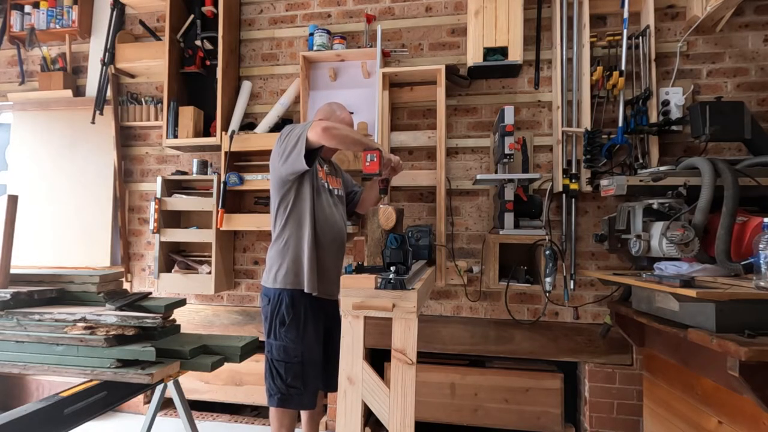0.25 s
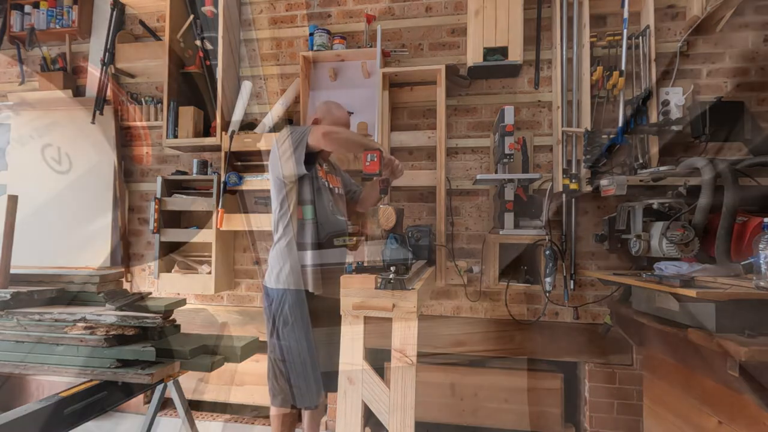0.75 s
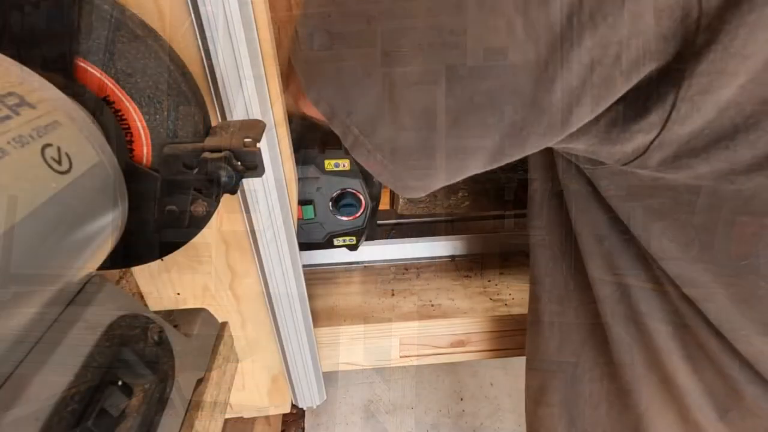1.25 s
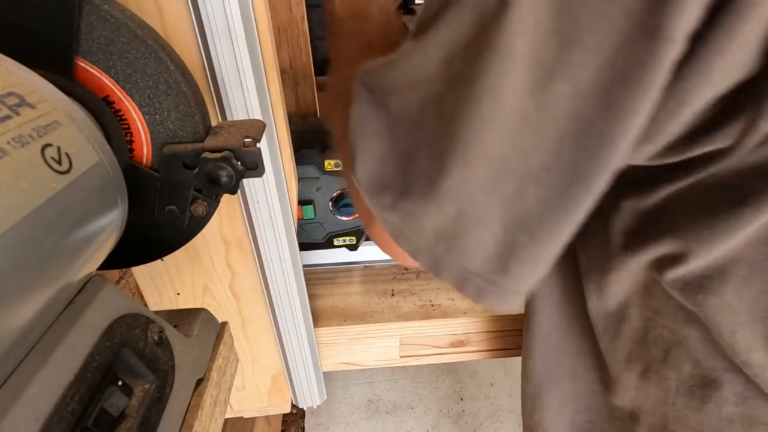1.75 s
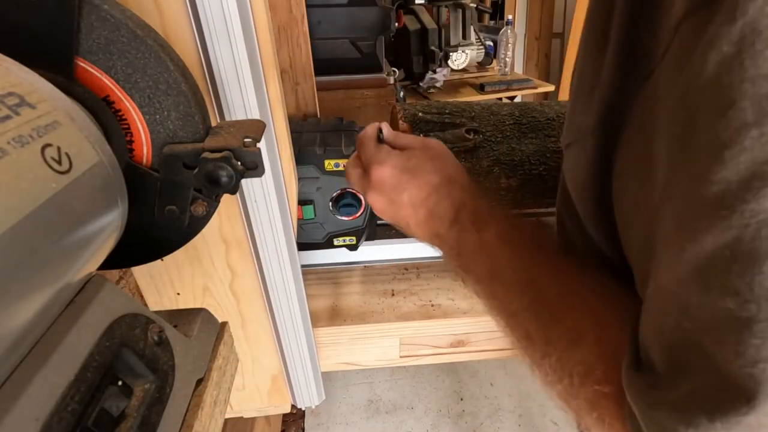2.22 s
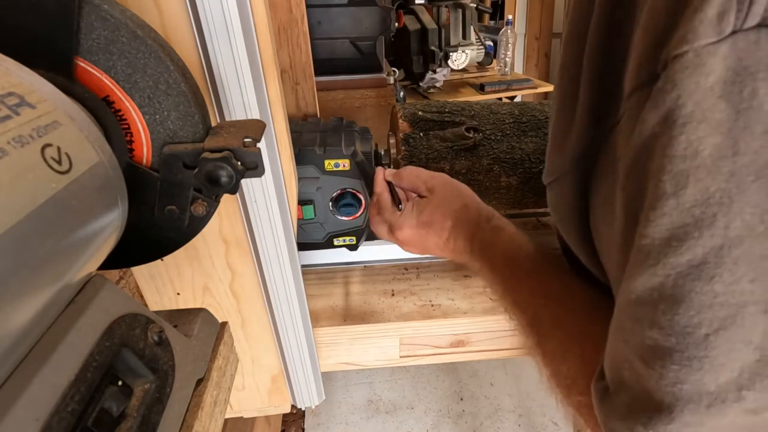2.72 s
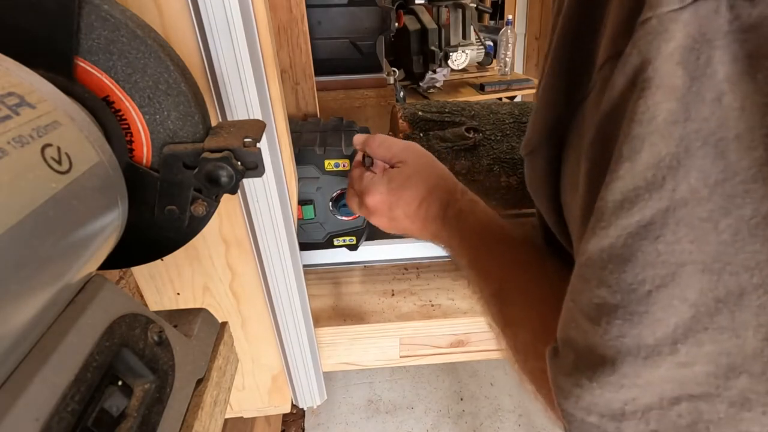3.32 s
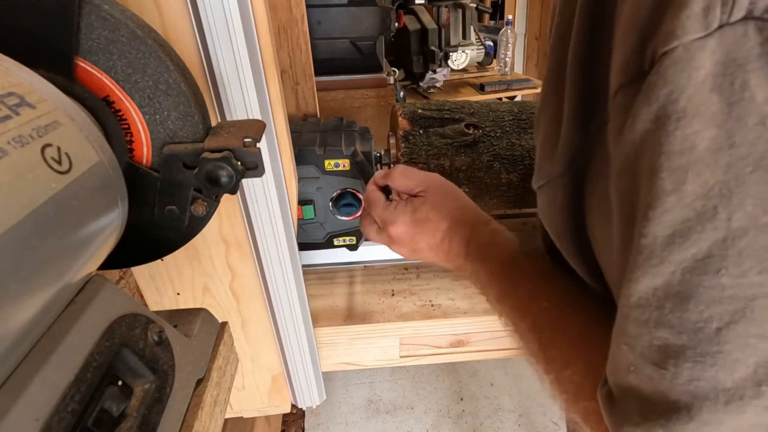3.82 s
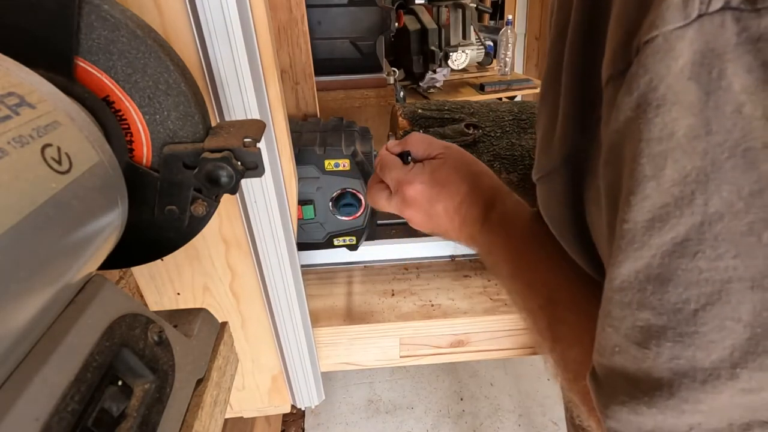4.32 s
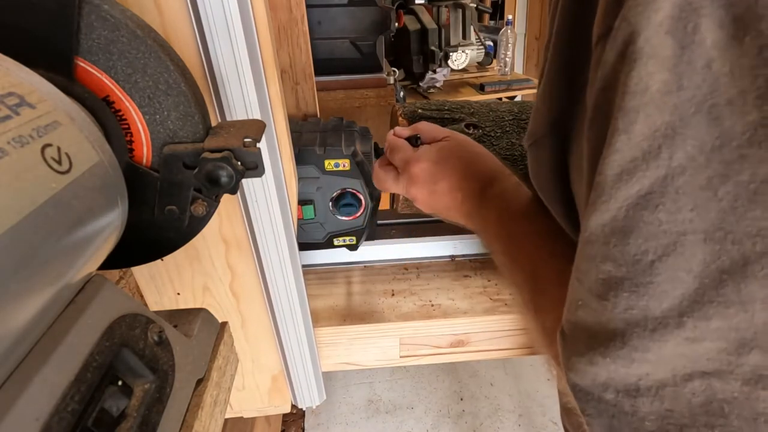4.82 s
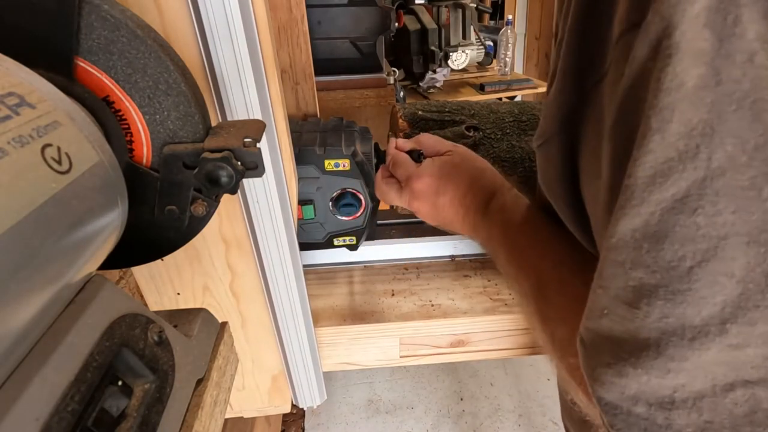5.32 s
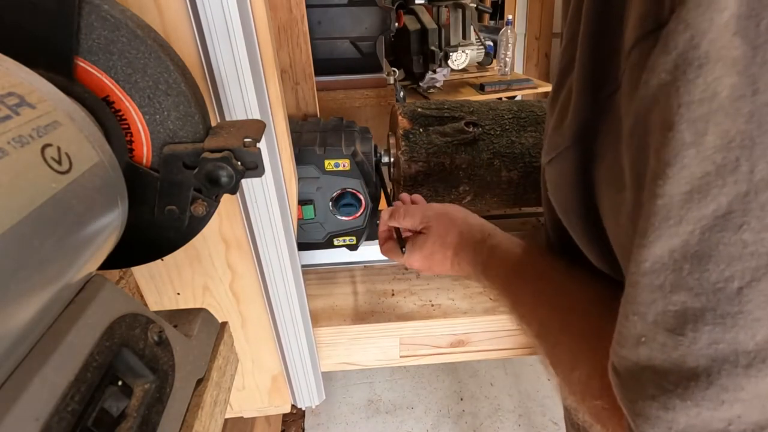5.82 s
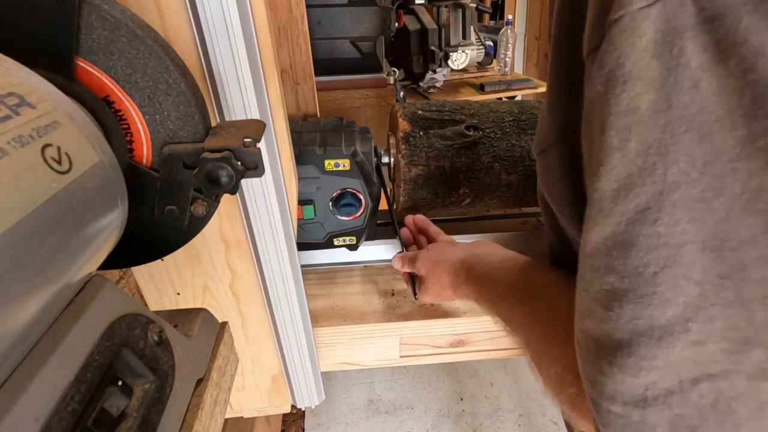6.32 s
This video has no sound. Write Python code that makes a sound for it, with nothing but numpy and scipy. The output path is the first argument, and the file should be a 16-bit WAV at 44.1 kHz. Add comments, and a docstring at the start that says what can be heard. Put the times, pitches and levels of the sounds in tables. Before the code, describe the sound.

A log is being clamped to a wooden sled in a quiet workshop. Irregular hollow knocks mix with brief timber scrapes and small creaks. Midway a clamp snaps tight and rings briefly, followed by the loudest knocks and bright wrench clinks. Lighter taps thin out, and a hand and shirt rub softly along the bench. The sounds are close, with slight room echo and very faint chirps.

```python
"""Brick workshop, saw not running: a log is clamped on a wooden sawmill sled with a steel wrench.
Blows ring the sled's modes; timber scrapes over timber in tiny slips; loaded joints creak.
Wrench and chain clink, and the clamp snaps tight once, its bar ringing on.
Near the end a hand and shirt rub along the bench. Faint chirps and room tone lie underneath."""
import sys
import numpy as np
from scipy import signal
from scipy.fft import rfft, irfft, next_fast_len
from scipy.io import wavfile
from scipy.ndimage import uniform_filter1d, map_coordinates

SR = 44100
rng = np.random.default_rng(int(sys.argv[2]) if len(sys.argv) > 2 else 0)


def digitize_waveform(pressure):
    """Quantize a signal to 16-bit integers and store it at the path in sys.argv[1].

    Rows of a 2-D input are taken as channels; values are limited to [-1, 1].
    """
    field = np.atleast_2d(pressure).T
    bounded = np.clip(field, -1, 1)
    quanta = np.round(bounded * 32767).astype(np.int16)
    wavfile.write(sys.argv[1], SR, quanta)


N = 289296
TIME_S = np.arange(N) / SR
HIT_S = np.arange(SR // 2) / SR  # time axis of one impact
TOP_HZ = 13900


# sled modes: f/Hz, level/dB, t60/s
SLED_MODES = [(290, -7.5, 0.097), (382.4, 2, 0.084), (390, -4, 0.13), (526.5, -5.5, 0.085),
              (804, -2.5, 0.077), (908, -3.5, 0.025), (1034, -5.5, 0.049), (1215, -6, 0.03),
              (1434, 0, 0.023), (1895, -2, 0.012), (2360, -2.5, 0.011), (2686, -13, 0.015),
              (3320, -3, 0.0055), (3960, -12.5, 0.025), (4780, -15, 0.0058)]
# blows, before band trims: t/s, level/dB, thump/dB re level, tick/dB re level, favoured mode f/Hz
SLED_BLOWS = [(0.586, -25.5, -17, -5.5, 2544), (0.81, -18, -1, -23.5, 870), (0.825, -16.5, 0.5, -9.5, 924),
              (0.961, -9, -4.5, -15.5, 880), (1.0, -14, -13, -10, 2605), (1.136, -18.5, -1, -31.5, 946),
              (1.201, -15.5, -5.5, -17, 797), (1.291, -28.5, 0, -10, 2470), (1.611, -16.5, -4, -20, 834),
              (1.778, -42.5, 5, -16, 770), (2.364, -10.5, -4.5, -14, 2082), (2.39, -19.5, -20, -30, 950),
              (2.416, -24, -2.5, -21, 1356), (2.427, -19.5, -1, -17.5, 786),
              (2.586, -23.5, -8, -12.5, 1018), (2.834, -11.5, -6, -5.5, 1400),
              (3.054, -27.5, -24, -30, 1010), (3.114, -10, -14, -5, 1094), (3.121, -12, -20, -20, 1036),
              (3.418, -26, 0, -25, 790), (3.455, -27.5, -5.5, -5.5, 1680), (3.539, -6, -6, -13.5, 1437),
              (3.645, -7.5, -17.5, -4.5, 1620), (3.787, -19, -14.5, -1, 1086), (3.798, -21, -9.5, -2, 820),
              (3.963, -26, -15, -49, 840), (4.096, -36, -3, -4.5, 1500), (4.24, -21.5, -1, -4.5, 1060),
              (4.503, -16.5, -3, -17, 812), (4.625, -16.5, -11, -13, 1492), (4.705, -22.5, -7, -17.5, 826),
              (5.206, -31.5, -5, -11.5, 1900), (5.66, -31, -5, -25, 745)]

def knocks():
    """The sled rings briefly; the strike point favours one mode, and hard contacts carry more treble."""
    out = np.zeros(N)
    for at_s, level_db, thump_db, tick_db, mode_hz in SLED_BLOWS:
        modes = ring(SLED_MODES, scatter_db=2.5, detune=0.028)
        blow = bending_waves(modes, lag_s=0.001908) + amp(1) * burst(t60_s=0.01)
        mode_envelope = amp(-60 * HIT_S / 0.025) * (1 - np.exp(-HIT_S / 0.0021))
        favoured = np.sin(2 * np.pi * mode_hz * HIT_S) * mode_envelope
        reflected = bench_echoes(blow, echo_db=-10.5, spread_s=0.0055)
        smeared = soft_contact(reflected, corner_hz=7000 * 2 ** (tick_db / 9))
        thump = sized(band(blow, 234, 628), level_db + thump_db - 3)
        rap = sized(sized(band(smeared, 805, 1910), 0) + sized(favoured, -1.5), level_db - 8)
        tick = sized(band(smeared, 2320, 5560), level_db + tick_db - 9.5)
        fizz = sized(band(smeared, 6000, 12000), level_db + tick_db - 33)
        rattle = sized(band(burst(t60_s=0.48), 270, 2630), level_db - 24.5)  # loose boards
        add(out, at_s - 0.0005, workshop(thump + rap + tick + fizz, wet_db=-12) + rattle)
    return out


# wrench and chain modes: f/Hz, level/dB, t60/s
STEEL_MODES = [(1476, -6, 0.17), (2390, -6, 0.13), (2640, 7, 0.021), (3010, -5, 0.041), (3400, -11.5, 0.12),
               (3900, -12, 0.044), (4350, -22.5, 0.59), (4870, -3.5, 0.054), (5580, 2, 0.023),
               (6260, 1.5, 0.035), (6550, -12, 0.25), (7380, 2.5, 0.059), (8360, -3, 0.11),
               (9600, -20, 0.12), (9900, -6, 0.09), (10220, -3.5, 0.1), (12500, -47, .06)]
# steel on steel, before band trims: t/s, level/dB, sparkle/dB re level
STEEL_CONTACTS = [(2.4178, -29.5, -23.5), (3.418, -38.5, -21), (3.499, -7.5, -19.5), (3.5129, -13.5, -17),
                  (3.7701, -14, -26.5), (3.7955, -18, -22), (4.4484, -31.5, -23)]

def clinks():
    """Wrench and chain links ring high and short, and jolt the wood under them."""
    out = np.zeros(N)
    for at_s, level_db, sparkle_db in STEEL_CONTACTS:
        steel = ring(STEEL_MODES, scatter_db=2, detune=0.0022) + amp(5) * burst(t60_s=0.079)
        clink = sized(band(steel, 1400, 5000), level_db - 11.5)
        sparkle = sized(band(steel, 7000, 14000), level_db + sparkle_db - 5.5)
        jolt = sized(band(burst(t60_s=0.16), 130, 1330), level_db - 17)
        add(out, at_s, workshop(clink + sparkle + jolt, wet_db=-19))
    return out


# clamp bar modes: f/Hz, relative level/dB, t60/s
CLAMP_MODES = [(830, 2, 0.18), (1080, -2, 0.19), (1610, -20, 0.36), (2100, -9, 0.31), (2500, -16, 1),
               (3000, -4.5, 0.33), (2860, -7, 0.19), (3160, -9, 0.15), (4592, -15, 0.47)]

def clamp_snap(at_s=3.115):
    """The clamp snaps tight with a hard crack; its bar buzzes and sings on."""
    crack = amp(1) * band(burst(t60_s=0.047), 2250, 3050)
    crack += amp(-3.5) * band(burst(t60_s=0.0093), 4070, 5800)
    bar = amp(-35.5) * ring(CLAMP_MODES, scatter_db=0.5, detune=0)
    buzz = amp(-14) * band(burst(t60_s=0.39), 2130, 2720)
    buzz += amp(-30.5) * band(burst(t60_s=0.41), 2600, 4800)
    out = np.zeros(N)
    add(out, at_s, workshop(crack + bar + buzz, wet_db=-29))
    return out


# timber friction spectrum: f/Hz, relative level/dB
RUB_SPECTRUM = [(88, -53), (150, -6.5), (385, 2), (641, -13), (788, -3), (1240, -6), (1470, -11),
                (2180, -16), (4060, -27.5), (8970, -58.5), (11900, -55), (13600, -78)]
# strokes: t/s, length/s, mid-stroke level/dB, swell/dB, grit/dB re level, squeal f/Hz, squeal/dB re level
TIMBER_STROKES = [(0.604, 0.043, -42, -2, -9, 983, -9), (1.033, 0.072, -37, 8, -10.5, 905, -3.5),
                  (1.29, 0.056, -38, -2.5, -9.5, 841, -9.5), (1.556, 0.085, -32.5, 2, -6, 846, -4.5),
                  (3.032, 0.085, -42.5, 13.5, -2.5, 1038, 0.5), (3.543, 0.119, -31, 8, -16, 360.3, -6.5),
                  (3.992, 0.062, -47.5, 4, -12, 554, 2), (4.227, 0.05, -30.5, -7, -8, 722, -8),
                  (4.404, .044, -31, 7, -6, 537, -9), (4.69, .185, -35.5, 5, -8.5, 791, -12),
                  (5.786, 0.053, -39.5, -7, -6, 498, -7.5)]

def scrapes(attack_s=0.017, release_s=0.014):
    """Tiny uneven slips shake the sled's modes and one resonance squeals; grit follows the pressure."""
    slips = rng.standard_normal(N) * amp(7 * np.tanh(wobble(210)))
    rub = filtered(slips, lambda hz: amp(along(RUB_SPECTRUM, hz)))
    modes = ring(SLED_MODES, scatter_db=-0.5, detune=0)
    wood = signal.fftconvolve(np.diff(slips, prepend=0), modes)[:N]
    body = unit(band(unit(rub) + amp(-3.5) * unit(wood), 210, 2290))
    grit, fizz = unit(band(rub, 1985, 6500)), unit(band(rub, 7000, 17000))
    out = np.zeros(N)
    for at_s, length_s, level_db, swell_db, grit_db, squeal_hz, squeal_db in TIMBER_STROKES:
        elapsed_s = np.clip(TIME_S - at_s, 0, length_s)
        ramp_db = swell_db * (elapsed_s / length_s - 0.5)
        fizz_db = -28 + 58 * elapsed_s  # brighter as the timber gathers speed
        grain = amp(grit_db + 2.1 * ramp_db) * (grit + amp(fizz_db) * fizz)
        rubbing = stroke(at_s, length_s, attack_s, release_s) * (amp(ramp_db) * body + grain)
        squeal = np.zeros(N)
        add(squeal, at_s, unit(glide(length_s + 2 * release_s, squeal_hz, squeal_hz, rough=0.05)))
        out += amp(level_db) * (rubbing + amp(squeal_db + ramp_db) * squeal)
    return workshop(out, wet_db=-17.5)


# joint creaks: centre t/s, length/s, f/Hz, level/dB
JOINT_CREAKS = [(1.632, 0.048, 3680, -35), (3.03, .12, 194, -36), (3.135, 0.0586, 195, -29),
                (3.428, 0.0453, 297, -26), (3.65, .2, 255, -32)]

def creaks():
    """Loaded joints stick and slip at one of their resonances."""
    out = np.zeros(N)
    for centre_s, length_s, hz, level_db in JOINT_CREAKS:
        add(out, centre_s - length_s / 2, amp(level_db) * glide(length_s, hz, hz, rough=0.05))
    return workshop(out, wet_db=-16)


# cloth friction spectrum: f/Hz, relative level/dB
CLOTH_SPECTRUM = [(88, -45), (150, -12.5), (350, 3), (465, -11.5), (521, 2), (629, -12), (1240, -15),
                  (1410, -12), (2400, -25), (2950, -23.5), (6630, -37), (8970, -46.5), (11900, -46.5),
                  (13600, -66)]

def hand_slide(level_db=-38):
    """Hand and shirt rub along the bench: one long stroke of soft, slightly uneven friction."""
    friction = rng.standard_normal(N) * amp(1.4 * wobble(90))
    cloth = unit(filtered(friction, lambda hz: amp(along(CLOTH_SPECTRUM, hz))))
    return amp(level_db) * cloth * stroke(at_s=5.93, length_s=0.54, attack_s=0.078, release_s=0.097)


# far-off calls: centre t/s, length/s, start f/Hz, end f/Hz, level/dB
FAR_CHIRPS = [(.03, .14, 1713, 1720, -51), (.046, 0.11, 5820, 6200, -58.5),
              (0.044, 0.14, 2925, 3200, -52.5), (0.071, 0.18, 4380, 4170, -54.5),
              (5.04, .2, 3300, 2600, -61), (6.424, 0.09, 3000, 3350, -54.5), (6.534, .09, 3380, 3840, -54)]

def chirps():
    """Thin wavering calls, perhaps birds outside, arriving mostly by way of the walls."""
    out = np.zeros(N)
    for centre_s, length_s, from_hz, to_hz, level_db in FAR_CHIRPS:
        add(out, centre_s - length_s / 2, amp(level_db) * glide(length_s, from_hz, to_hz, rough=0.032))
    return workshop(out, wet_db=1)


# room tone spectrum: f/Hz, relative level/dB
ROOM_SPECTRUM = [(15, -81), (25, -43), (72, -10.5), (139, -3), (247, -9), (466, -15), (531, -13.5),
                 (924, -18.5), (1340, -20.5), (2090, -24.5), (3640, -30.5), (11600, -58), (13600, -63)]

def room_tone(rise_s=1.2):
    """Rumble, a drifting body and a near-steady hiss; the lows come up at first."""
    noise = filtered(rng.standard_normal(N), lambda hz: amp(along(ROOM_SPECTRUM, hz)))

    def part(lo_hz, hi_hz):
        return unit(filtered(noise, lambda hz: (hz >= lo_hz) & (hz < hi_hz)))

    early = np.maximum(1 - TIME_S / rise_s, 0)
    rumble = part(0, 120) * amp(-56 - 10 * early)
    body = part(120, 900) * amp(-47 - early + 1.2 * wobble(8.8))
    hiss = part(900, TOP_HZ) * amp(-55.5 + 0.23 * wobble(2.5))
    return rumble + body + hiss


# brick room decay: f/Hz, t60/s
WALL_DECAY = [(150, 0.69), (500, 0.69), (2500, 0.54), (6000, 0.64), (12000, 0.57)]

def workshop(x, wet_db):
    """Direct sound plus a diffuse tail from the walls."""
    hz, t_s, spectrum = signal.stft(rng.standard_normal(len(HIT_S)), SR, nperseg=256)
    decay = amp(-60 * t_s / along(WALL_DECAY, hz)[:, None])
    tail = signal.istft(spectrum * decay, SR, nperseg=256)[1][:len(HIT_S)]
    tail *= 1 - np.exp(-(HIT_S / 0.0076) ** 2)
    return x + amp(wet_db) * signal.fftconvolve(x, tail / np.linalg.norm(tail))[:len(x)]


def bench_echoes(x, echo_db, spread_s):
    """Five early reflections from bench and log."""
    taps = np.zeros(SR // 50)
    taps[0] = 1
    delays_s = (np.arange(5) + rng.random(5)) / 5 * spread_s
    taps[1 + (delays_s * SR).astype(int)] = amp(echo_db) * np.sign(rng.standard_normal(5))
    return signal.fftconvolve(x, taps)[:len(x)]


def bending_waves(x, lag_s):
    """Wave speed in a beam grows as the root of frequency, so lows arrive late; lag_s is at 1 kHz."""
    return filtered(x, lambda hz: np.exp(-4j * np.pi * lag_s * np.sqrt(1000 * hz)))


def soft_contact(x, corner_hz):
    """A longer contact cannot excite the higher modes."""
    return signal.sosfilt(signal.butter(2, min(corner_hz, SR / 4), fs=SR, output="sos"), x)


def ring(modes, scatter_db, detune):
    """Damped modes; each blow lands elsewhere and excites them differently."""
    hz, db, t60_s = np.transpose(modes)[:, :, None]
    level, pitch, side = rng.standard_normal((3, len(modes), 1))
    envelopes = np.sign(side) * amp(db + scatter_db * level - 60 * HIT_S / t60_s)
    return np.sum(envelopes * np.sin(2 * np.pi * hz * (1 + detune * pitch) * HIT_S), axis=0)


def burst(t60_s):
    """Decaying noise."""
    return rng.standard_normal(len(HIT_S)) * amp(-60 * HIT_S / t60_s)


def glide(length_s, from_hz, to_hz, rough):
    """Swelling tone with random phase slip; rough is line width over pitch."""
    progress = np.linspace(0, 1, int(length_s * SR))
    hz = from_hz + (to_hz - from_hz) * progress
    slip = np.sqrt(2 * np.pi * rough * from_hz / SR) * rng.standard_normal(len(progress))
    slip = uniform_filter1d(slip, size=int(4 * SR / from_hz))
    return np.sin(np.pi * progress) * np.sin(np.cumsum(2 * np.pi * hz / SR + slip))


def stroke(at_s, length_s, attack_s, release_s):
    """Rub envelope: linear rise, hold, exponential decay."""
    rise = np.clip((TIME_S - at_s) / attack_s, 0, 1)
    return rise * np.exp(-np.maximum(TIME_S - at_s - length_s, 0) / release_s)


def wobble(knots_per_s):
    """Smooth random curve."""
    return map_coordinates(rng.standard_normal(int(N * knots_per_s / SR) + 4), [TIME_S * knots_per_s])


def amp(db):
    """dB to gain."""
    return 10 ** (np.asarray(db) / 20)


def unit(x):
    """Scale to rms 1."""
    return x / np.sqrt(np.mean(x ** 2) + 1e-20)


def sized(x, db):
    """Scale a blow so its energy, packed into 10 ms, has this rms level."""
    return amp(db) * x / np.sqrt(np.sum(x ** 2) / (SR / 100))


def along(points, hz):
    """Interpolate (f/Hz, value) points on a log axis."""
    point_hz, values = np.transpose(points)
    return np.interp(np.log(hz + 1), np.log(point_hz + 1), values)


def filtered(x, response):
    """Apply a complex frequency response."""
    size = next_fast_len(len(x) + 8192)
    return irfft(rfft(x, size) * response(np.fft.rfftfreq(size, 1 / SR)), size)[:len(x)]


def band(x, lo_hz, hi_hz):
    """Causal band-pass."""
    return signal.sosfilt(signal.butter(3, [lo_hz, hi_hz], btype="band", fs=SR, output="sos"), x)


def add(track, at_s, sound):
    """Mix a sound in, cropped to the track."""
    start = round(at_s * SR)
    sound = sound[max(-start, 0):]
    part = track[max(start, 0):][:len(sound)]
    part += sound[:len(part)]


def scene():
    """All sources, mono."""
    work = knocks() + clinks() + clamp_snap() + scrapes() + hand_slide() + creaks()
    return (work + chirps() + room_tone())[None]


# microphone response: f/Hz, gain/dB
MIC_RESPONSE = [(20, -2.5), (7400, 1.5), (8400, -4.5), (9100, -17), (9700, -5), (10400, 1.5), (12500, 4),
                (13700, -30)]

def record(dry):
    """Microphone with a narrow treble notch and a band limit."""
    return filtered(dry[0], lambda hz: amp(along(MIC_RESPONSE, hz)) * (hz < TOP_HZ))[None]


dry = scene()
out = record(dry)
digitize_waveform(out)
```